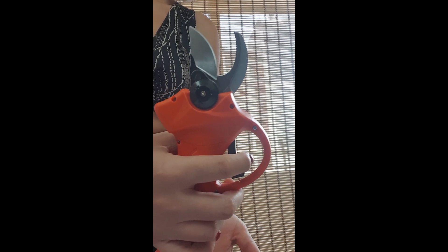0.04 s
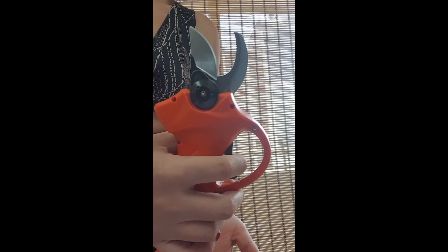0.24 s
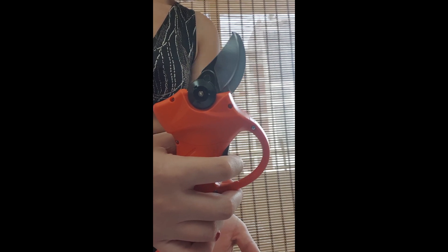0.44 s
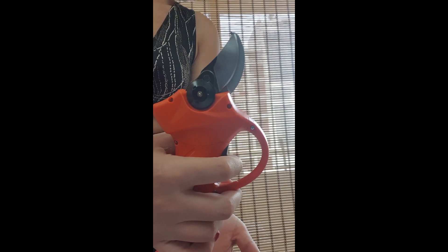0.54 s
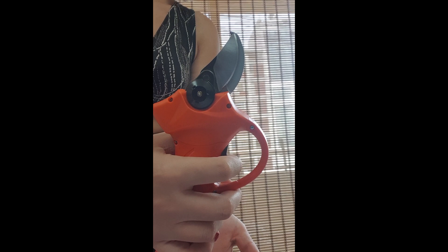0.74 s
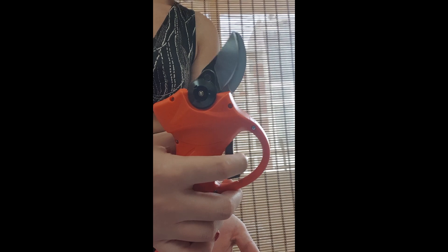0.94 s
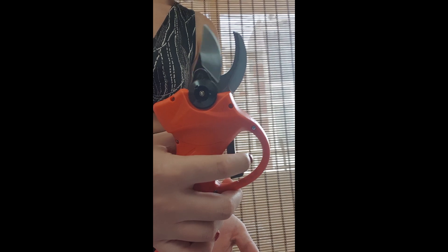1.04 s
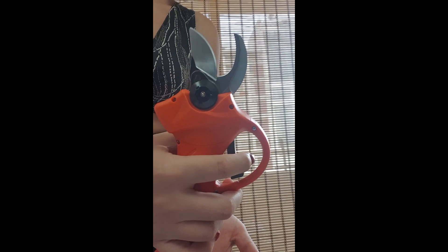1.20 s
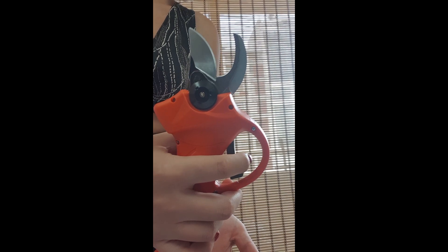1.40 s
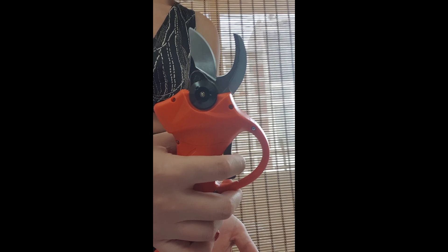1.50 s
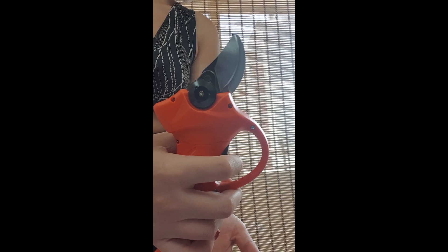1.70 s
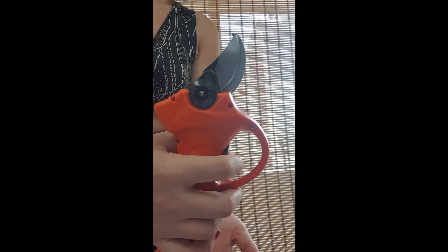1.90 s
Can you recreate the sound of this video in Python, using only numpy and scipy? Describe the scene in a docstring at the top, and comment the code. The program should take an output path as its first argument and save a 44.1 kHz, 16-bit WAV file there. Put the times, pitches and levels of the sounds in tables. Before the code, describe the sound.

Battery pruning shears close, open and close again on nothing. Each stroke is a short, high motor whine with rasping, clattering gears. They are close to the microphone in a small room with a faint low rumble.

```python
"""Battery pruning shears working on nothing, close to a stereo pair of microphones in a small room.
Over a low rumble the shears close at 0.2 s, open at 0.9 s and close again at 1.5 s.
Each stroke starts with a few electric ticks in the motor, which spins up as the slack gears clatter.
It whines through a planetary gear, the teeth rasping in time with the planet carrier,
then it brakes and the room rings briefly."""
import sys
import numpy as np
from scipy import signal
from scipy.fft import rfft, irfft
from scipy.io import wavfile
from scipy.ndimage import map_coordinates

SR = 44100
rng = np.random.default_rng(int(sys.argv[2]) if len(sys.argv) > 2 else 0)


def master(y):
    """Save y as 16-bit WAV."""
    cut = np.clip(np.atleast_2d(y).T, -1, 1)
    pcm = np.round(cut * 32767)  # scale
    wavfile.write(sys.argv[1], SR, pcm.astype(np.int16))


N = 85995
TIME = np.arange(N) / SR

# The strokes. Each row: start in seconds, full speed in motor turns per second, trims in dB
# for whine, rasp, hiss and clatter, direction (0 closing, 1 opening).
BLADE_STROKES = [(0.2208, 319.7, -0.5, 0.5, 0, -0.5, 0), (0.8688, 321.8, -1, -2, -4.5, 0, 1),
                 (1.4836, 318.6, -1, 0, -0.5, -0.5, 0)]
# Whine partials from imbalance, magnetic pull and tooth meshing, in cycles per motor turn.
WHINE_ORDERS = [1, 4, 4.8, 6.2, 7.2, 9.6, 12, 16, 19.2]
# Closing, then opening. Each row: the relative level in dB of every partial.
PARTIALS_DB = [(-49, -49.5, -39.5, -32, -59.5, -24, -42, -18, -24),
               (-44.5, -47.5, -30.5, -49, -31, -38.5, -43.5, -19, -25.5)]
# Sensing pulses before the motor turns: the relative strength of each in dB.
PULSES_DB = [-9.5, -2.5, 2.5, -13]
# Modes of the motor shell. Each row: frequency in Hz, relative level in dB, T60 in seconds.
SHELL_MODES = [(2268, -33.5, 0.028), (4252, -28.5, 0.044), (5250, -9, 0.003), (5985, -10.5, 0.0069),
               (6820, -20, 0.005), (11410, -42, 0.0029)]
# Spectra of tooth rasp, sliding hiss and slack clatter. Each row: frequency in Hz, relative level in dB.
RASP_SPECTRUM = [(1500, -47.5), (2900, -16), (3500, -25.5), (4200, -21), (4800, -9.5), (5550, -12.5),
                 (6100, -2.5), (6500, -9), (7000, -14.5), (7550, -15.5), (8400, -34), (16000, -44)]
HISS_SPECTRUM = [(4000, -21), (8500, -23.5), (9300, -1.5), (10100, -3), (11000, 3), (12300, -1.5),
                 (13500, -13.5), (14600, -9), (15400, -9.5), (16500, -32.5)]
CLATTER_SPECTRUM = [(120, -25.5), (260, -40), (400, -17), (520, -30), (800, -16.5), (1100, -16),
                    (1400, -9.5), (2050, 2), (2600, -5.5), (3600, -12), (8000, -27)]
# Shading of the left microphone. Each row: frequency in Hz, level against the right in dB.
LEFT_SHADE = [(300, -3), (700, 0.06), (1300, -2), (2300, -10), (3100, -17), (5100, -20), (6200, -20),
              (7400, -13), (8500, 0), (12000, 0.06), (16000, 0.2)]
# Gear noise at the two microphones. Each row: frequency in Hz, likeness from 0 to 1.
MIC_COHERENCE = [(500, 0.91), (1300, 0.74), (3000, 0.46), (16000, 0.22)]
# Colour of the reverberation. Each row: frequency in Hz, gain in dB.
REVERB_COLOUR = [(200, -23.5), (1000, -14.5), (2000, -18), (3060, -17), (4200, -10.5), (5100, -21),
                 (6150, -22), (8500, -15), (12000, -25.5), (16000, -16.5)]
# Room resonances that the opening whine sets ringing. Each row: frequency in Hz, gain in dB, T60 in seconds.
ROOM_RESONANCES = [(1545, -12.5, 0.48), (2317, -15, 0.23)]
# Spectrum of the room tone. Each row: frequency in Hz, relative level in dB.
ROOM_TONE_SPECTRUM = [(12, -38), (20, -1), (65, 3), (113, -6.5), (222, -6.5), (558, -13), (897, -16),
                      (1610, -19.5), (3530, -36), (4180, -32.5), (5680, -36.5), (6720, -34.5),
                      (8180, -48.5), (12400, -66), (16000, -76)]
# Its stereo width. Each row: frequency in Hz, side against mid in dB.
ROOM_TONE_WIDTH = [(60, -16.5), (250, -20.5), (700, -5), (3000, 2.5)]
# Course of the low rumble. Each row: time in seconds, gain in dB.
RUMBLE_COURSE = [(0, 3), (.55, -1.5), (.95, 1), (1.08, 1.5), (1.2, 0), (1.3, 6), (1.43, -1), (1.95, 1)]

WAIT_S, SPIN_UP_S, BRAKE_AT_S, BRAKE_S = .004, .038, .158, .033
GEAR_RATIO, MESHES_PER_TURN, TIGHT_SPOT_TURNS = 5, 4.8, .93
RASP_DB, HISS_DB, CLATTER_DB = -18, -27, -24.5


def shears():
    """The three strokes: ticks and whine as one signal, and two unrelated rows of gear noise."""
    tones, rasp, hiss, clatter = ticks(), 0, 0, 0
    for start, turns_per_s, whine_db, rasp_db, hiss_db, clatter_db, direction in BLADE_STROKES:
        speed, turns = motor_motion(start, turns_per_s)
        tones = tones + from_db(whine_db) * whine(speed, turns, PARTIALS_DB[round(direction)])
        # The load on the teeth swings once and twice per carrier turn.
        carrier_angle = 2 * np.pi * (turns / GEAR_RATIO - TIGHT_SPOT_TURNS)
        load_db = 1.8 * np.cos(carrier_angle) + 1.9 * np.cos(2 * carrier_angle)
        contacts = gear_teeth(turns)
        rasp = rasp + contacts * from_db(rasp_db + load_db) * speed ** 2
        hiss = hiss + contacts * from_db(hiss_db + load_db / 2) * speed
        # Slack gears clatter more in spin-up, less in braking.
        slack_db = np.where(TIME < start + BRAKE_AT_S, 1.5, -1.5) * np.sin(np.pi * speed)
        clatter = clatter + gear_teeth(turns) * from_db(clatter_db + slack_db) * speed ** .3
    gears = (from_db(RASP_DB) * colour(rasp, RASP_SPECTRUM, keep_power=True)
             + from_db(HISS_DB) * colour(hiss, HISS_SPECTRUM, keep_power=True)
             + from_db(CLATTER_DB) * colour(clatter, CLATTER_SPECTRUM, keep_power=True))
    return tones, gears


def motor_motion(start, turns_per_s, wander=.002):
    """Share of full speed and turns made: the motor waits, spins up, holds and brakes."""
    t = TIME - start
    rise = 1 - (1 - np.clip((t - WAIT_S) / SPIN_UP_S, 0, 1)) ** 2
    fall = 1 - np.clip((t - BRAKE_AT_S) / BRAKE_S, 0, 1) ** 1.1
    speed = rise * fall
    return speed, np.cumsum(speed * turns_per_s * (1 + wander * drift(70))) / SR


def whine(speed, turns, levels_db, flutter_db=2.5):
    """Fluttering partials locked to the shaft; they excite shell and housing as they sweep past."""
    partials = 0
    for order, db in zip(WHINE_ORDERS, levels_db):
        height = np.sqrt(2) * from_db(db + flutter_db * drift(130))
        partials = partials + height * np.sin(2 * np.pi * (order * turns + rng.random()))
    shell_hz, _, shell_t60 = SHELL_MODES[1]
    shell = from_db(10) * resonate(partials * speed, shell_hz, shell_t60)
    housing_growl = from_db(-3) * resonate(partials * np.sin(np.pi * speed), hz=2500, t60=.0064)
    return partials * speed ** 4 + shell + housing_growl


def gear_teeth(turns, scatter_db=1.3, decay=.9, repeat_share=.37, surface_points=690):
    """A burst of grit at each tooth contact, partly the same on every carrier turn; two unrelated rows."""
    mesh = turns * MESHES_PER_TURN
    strength = from_db(scatter_db * rng.standard_normal(1024))[mesh.astype(int)]
    position = (turns / GEAR_RATIO % 1 * surface_points).astype(int)
    surface = rng.standard_normal((2, surface_points))[:, position]
    pace = np.gradient(turns)
    share = repeat_share * pace / pace.max()
    grit = np.sqrt(share) * surface + np.sqrt(1 - share) * rng.standard_normal((2, N))
    burst = np.exp(-decay * (mesh % 1 - .5)) / np.sqrt(np.sinh(decay) / decay)  # mean power 1
    return grit * strength * burst


def ticks(gap_s=.00095):
    """Short current pulses ring the motor shell at the start of each stroke."""
    pulses = np.zeros(N)
    for start, *_ in BLADE_STROKES:
        for k, db in enumerate(PULSES_DB):
            pulses[int(start * SR) + round(k * gap_s * SR)] = from_db(db)
    return sum((-1) ** k * from_db(db) * ring(pulses, hz, t60)
               for k, (hz, db, t60) in enumerate(SHELL_MODES))


def microphones(tones, gears, left_lag_s=.00004):
    """Close up, the right microphone faces the motor; the left hears it shaded and a little later."""
    hz, likeness = np.transpose(MIC_COHERENCE)
    shared = colour(gears[0], np.c_[hz, 20 * np.log10(likeness)])
    left_only = colour(gears[1], np.c_[hz, 10 * np.log10(1 - likeness ** 2)])
    shaded = colour(tones + shared + left_only, LEFT_SHADE)
    left = np.interp(TIME - left_lag_s, TIME, shaded)
    return np.array([left, tones + gears[0]])


def small_room(tones, gears):
    """Narrow resonances and reverberation; the whine beams at the microphones, so less reaches the walls."""
    ringing = sum(from_db(db) * resonate(tones, hz, t60) for hz, db, t60 in ROOM_RESONANCES)
    spill = colour(gears[0] + from_db(-4) * tones, REVERB_COLOUR)
    return ringing + reflections(spill, t60=.44)


def reflections(x, t60):
    """Dense echoes arriving after 3 ms and dying away, different at each microphone."""
    t = TIME[:SR]
    response = rng.standard_normal((2, SR)) * from_db(-60 * t / t60) * (t > .003)
    response /= np.sqrt(np.sum(response ** 2, axis=1, keepdims=True))
    return signal.fftconvolve(np.atleast_2d(x), response, axes=1)[:, :N]


def room_tone(swing_db=1.5, left_db=-3.5):
    """Quiet room noise with an uneven rumble below 120 Hz, weaker on the left."""
    mid, side = colour(rng.standard_normal((2, N)), ROOM_TONE_SPECTRUM, keep_power=True)
    noise = from_db(-50.5) * (mid + colour(side, ROOM_TONE_WIDTH) * [[1], [-1]])
    rumble = signal.sosfilt(signal.butter(1, 120, fs=SR, output="sos"), noise)
    swell = from_db(np.interp(TIME, *np.transpose(RUMBLE_COURSE)) + swing_db * drift(27))
    return (noise + rumble * (swell - 1)) * from_db([[left_db], [0]])


def ring(x, hz, t60):
    """A damped mode: a unit click sets a sine of height 1 ringing."""
    radius, angle = from_db(-60 / (t60 * SR)), 2 * np.pi * hz / SR
    return signal.lfilter([0, np.sin(angle)], [1, -2 * radius * np.cos(angle), radius ** 2], x + 1e-18)


def resonate(x, hz, t60):
    """A resonance with gain 1 at its peak."""
    return 2 * (1 - from_db(-60 / (t60 * SR))) * ring(x, hz, t60)


def colour(x, points, keep_power=False):
    """Minimum-phase filter through (Hz, dB) points joined along log frequency."""
    size = 2 ** 17
    hz, db = np.transpose(points)
    bins_hz = np.fft.rfftfreq(size, 1 / SR)
    gain = from_db(np.interp(np.log(bins_hz + 1e-3), np.log(hz), db))
    if keep_power:
        gain /= np.sqrt(np.mean(gain ** 2))
    cepstrum = irfft(np.log(gain))
    cepstrum[1:size // 2] *= 2
    cepstrum[size // 2 + 1:] = 0
    return irfft(rfft(x, size) * np.exp(rfft(cepstrum)))[..., :N]


def drift(knots_per_s):
    """A smooth random curve with a spread of about 1."""
    return map_coordinates(rng.standard_normal(1024), [TIME * knots_per_s], order=2, mode="wrap")


def from_db(db):
    """Decibels to amplitude."""
    return 10 ** (np.asarray(db) / 20)


def scene():
    """From near to far: the shears, nearby surfaces, the room and its background."""
    tones, gears = shears()
    direct = microphones(tones, gears)
    nearby_surfaces = from_db(-11) * reflections(direct, t60=.1)
    return direct + nearby_surfaces + small_room(tones, gears) + room_tone()


def record(dry, low_cut_hz=33, high_cut_hz=16200):
    """Steep filters on both microphones cut the deep bass and the very top."""
    dry = signal.sosfilt(signal.butter(6, low_cut_hz, "high", fs=SR, output="sos"), dry)
    return signal.sosfilt(signal.ellip(10, .2, 80, high_cut_hz, fs=SR, output="sos"), dry)


dry = scene()
out = record(dry)
master(out)
```